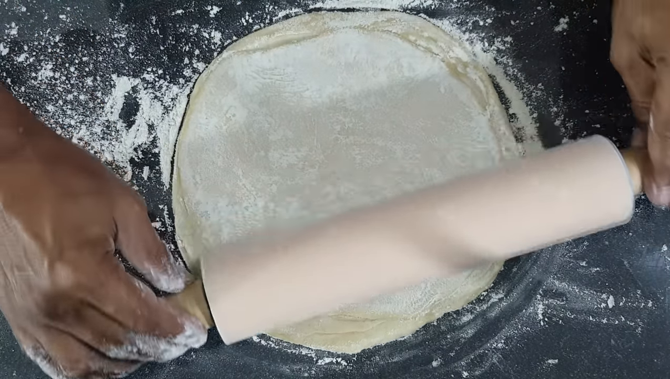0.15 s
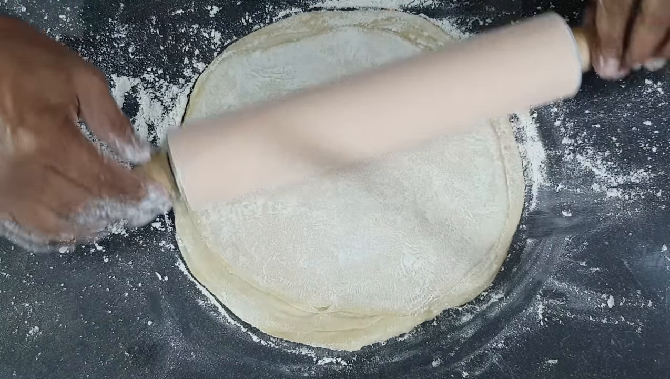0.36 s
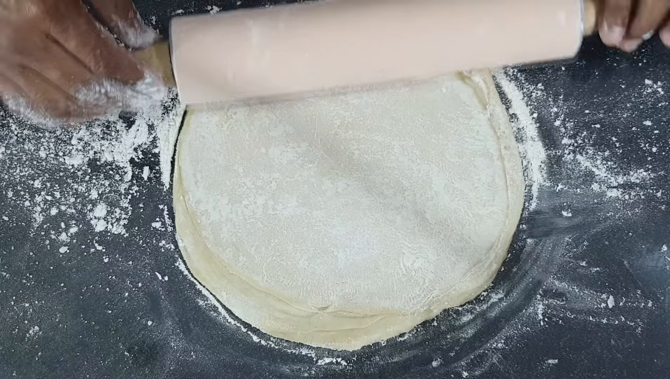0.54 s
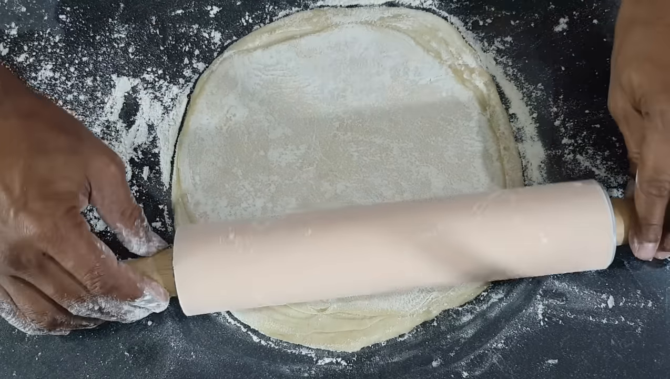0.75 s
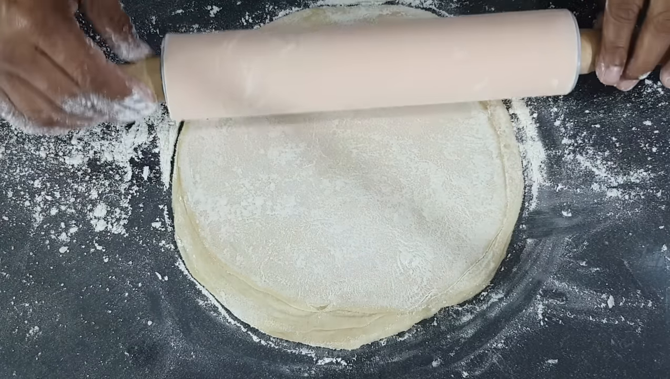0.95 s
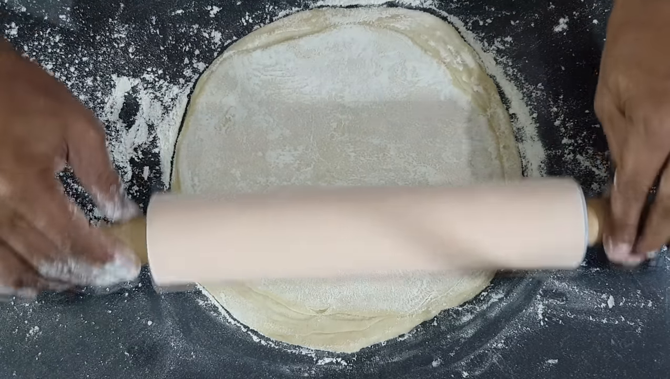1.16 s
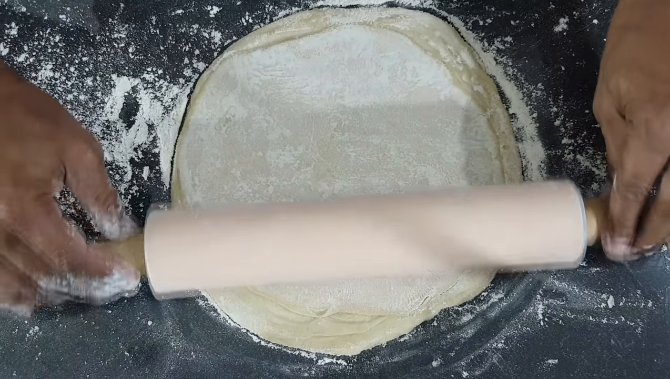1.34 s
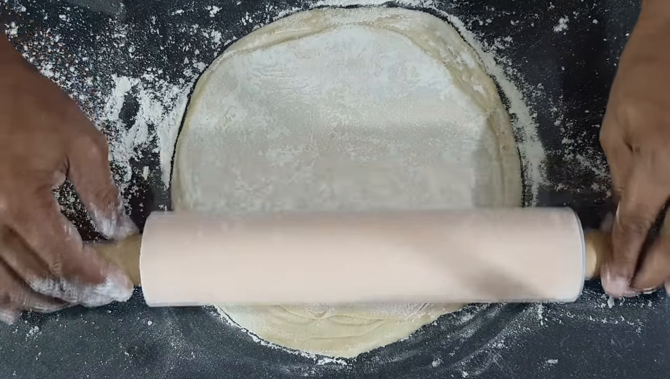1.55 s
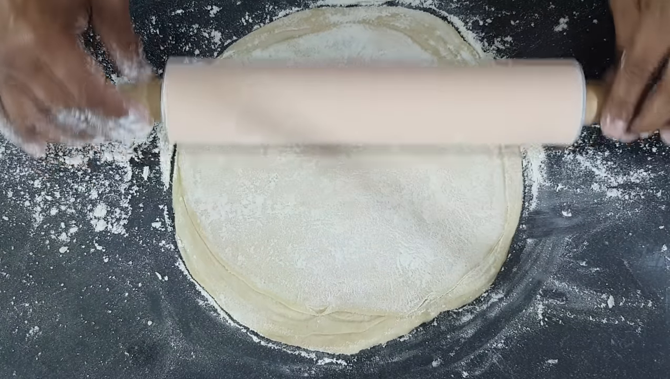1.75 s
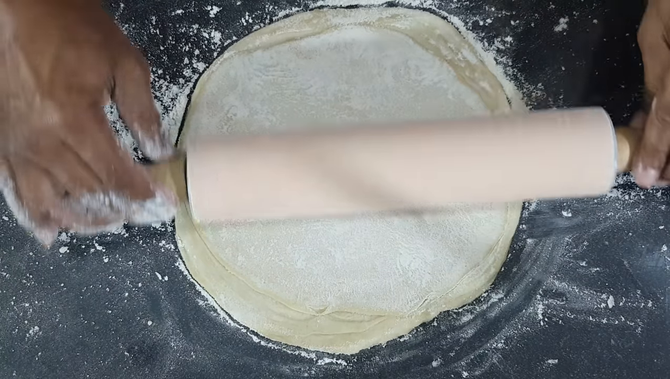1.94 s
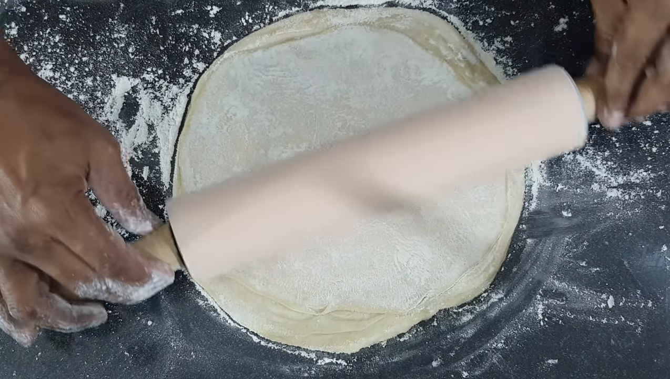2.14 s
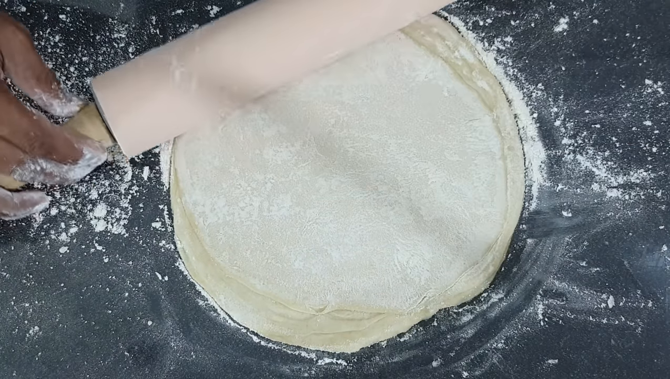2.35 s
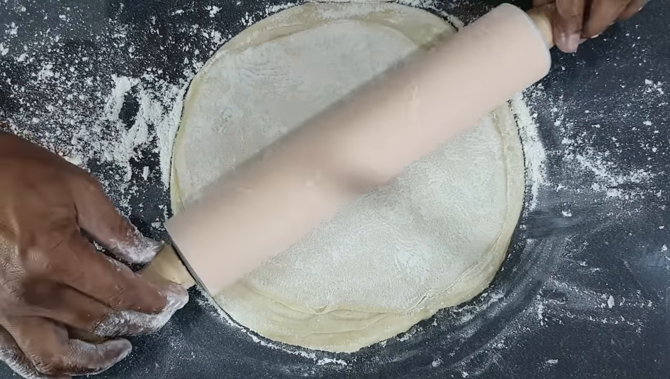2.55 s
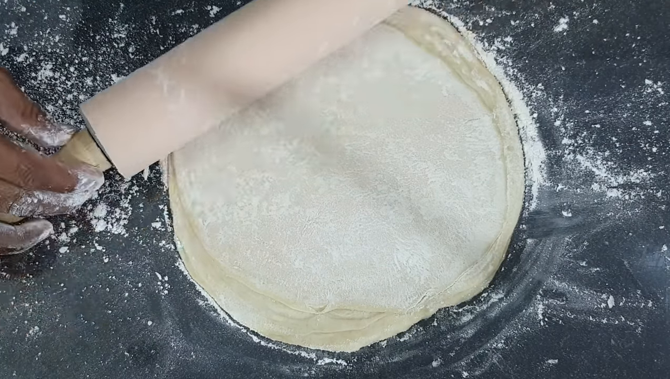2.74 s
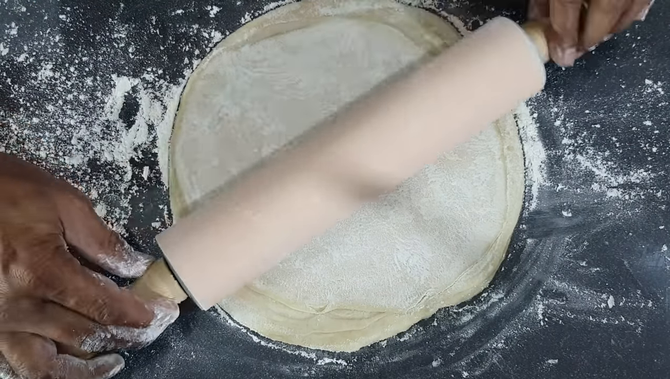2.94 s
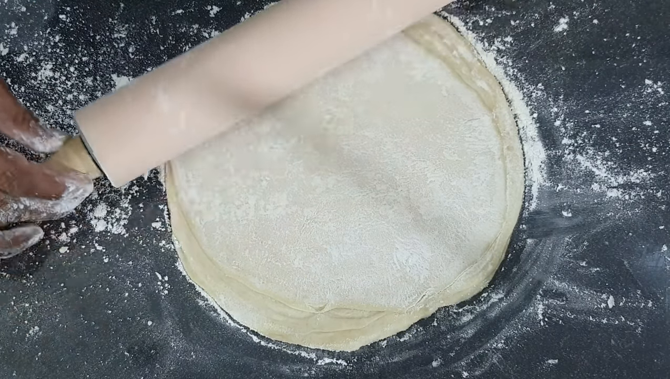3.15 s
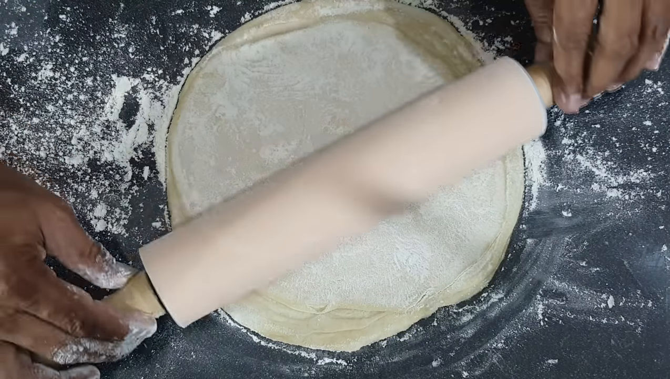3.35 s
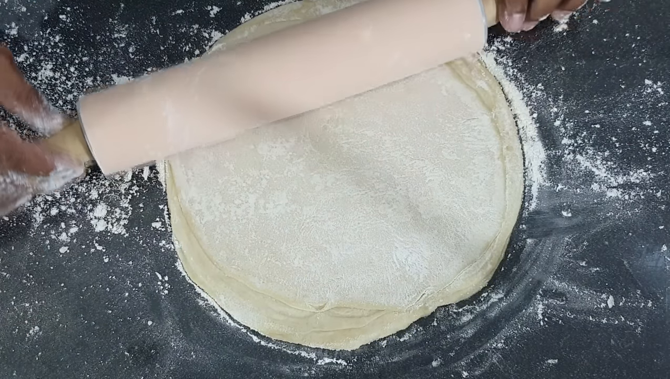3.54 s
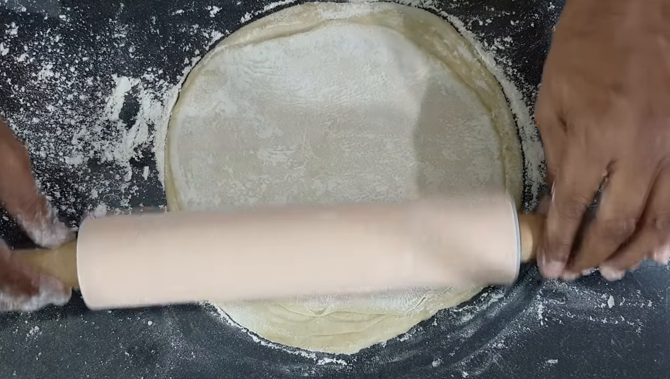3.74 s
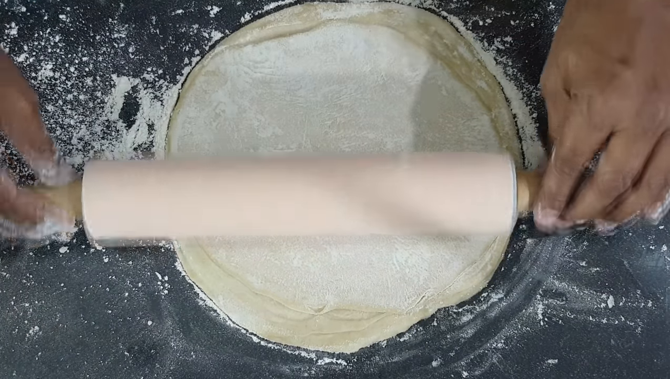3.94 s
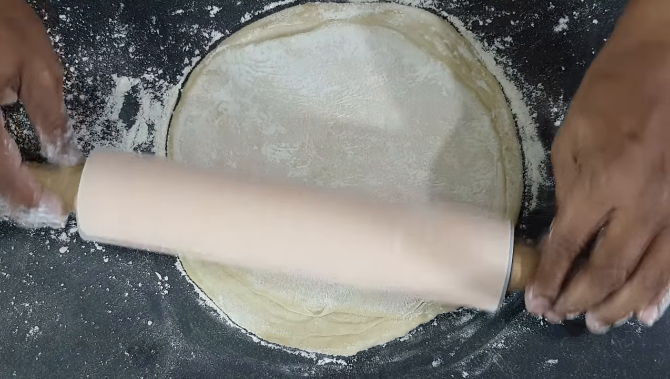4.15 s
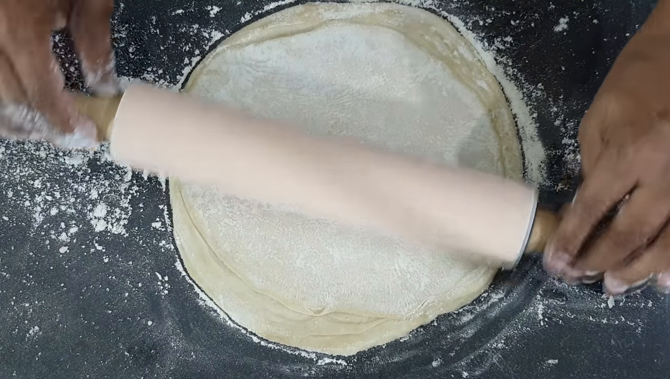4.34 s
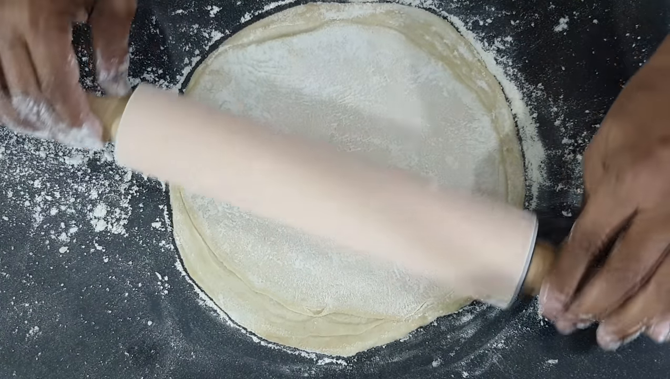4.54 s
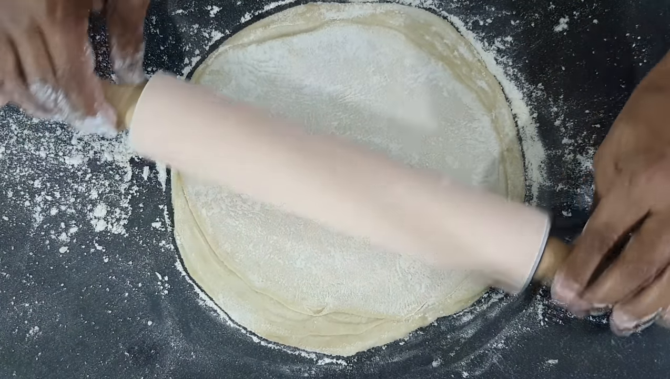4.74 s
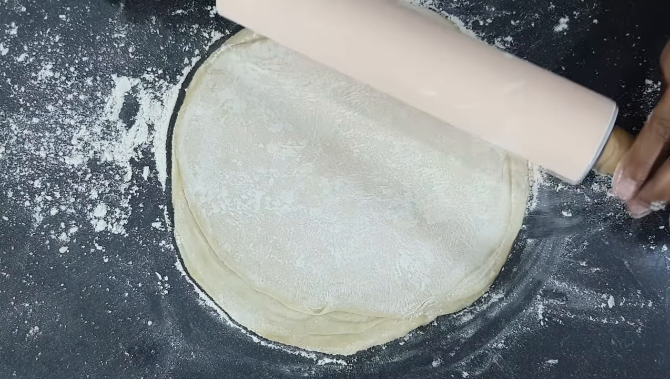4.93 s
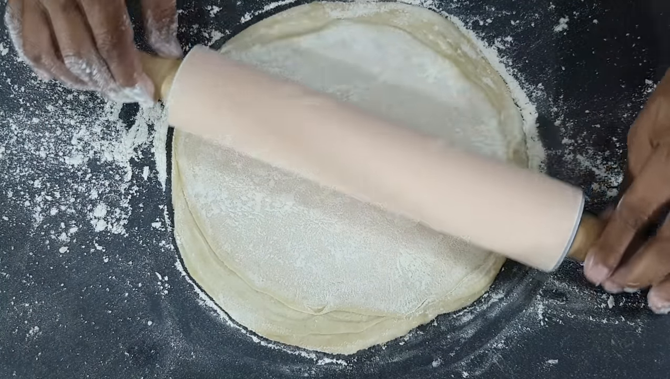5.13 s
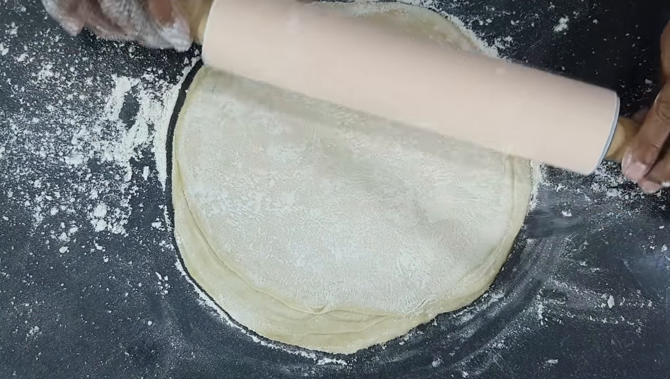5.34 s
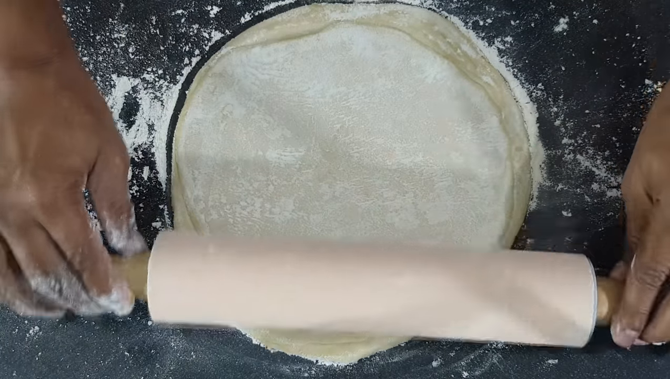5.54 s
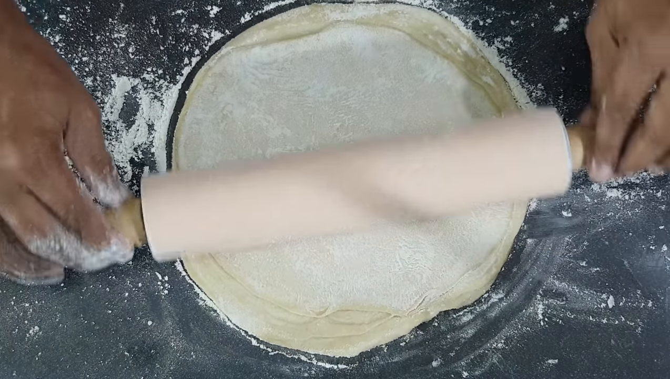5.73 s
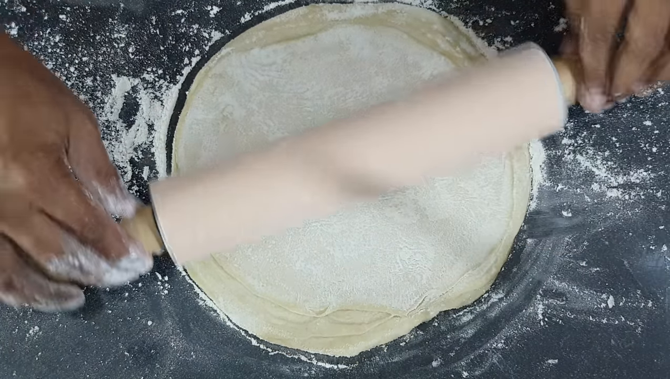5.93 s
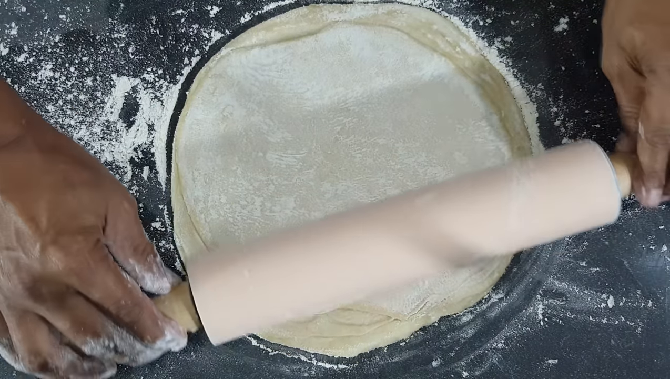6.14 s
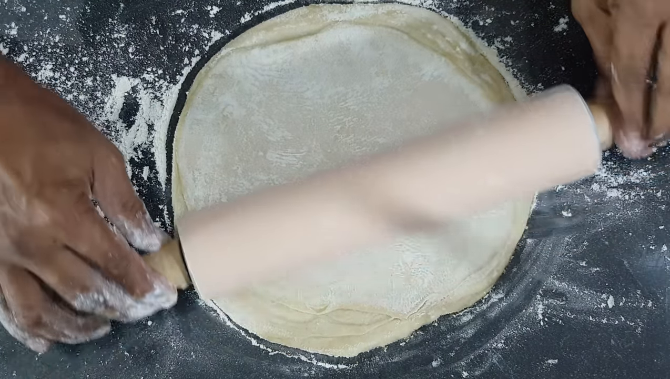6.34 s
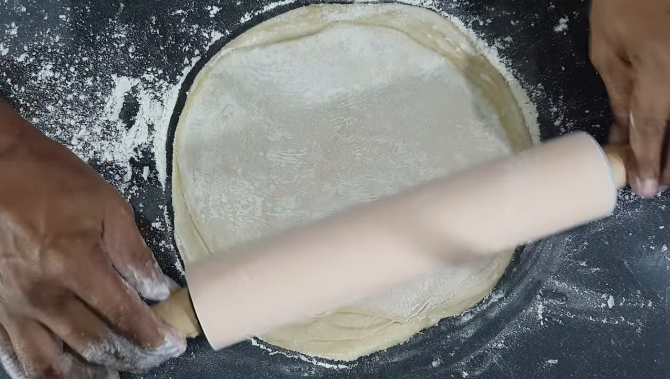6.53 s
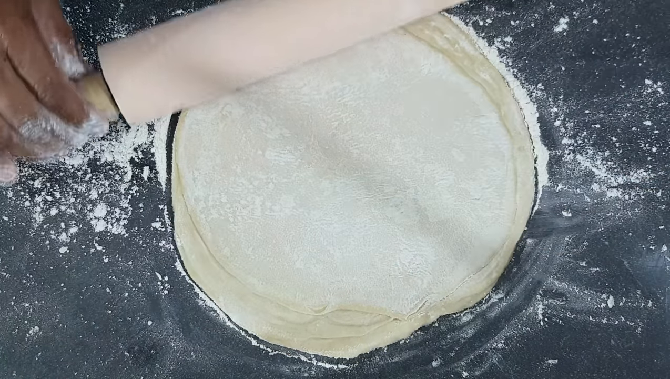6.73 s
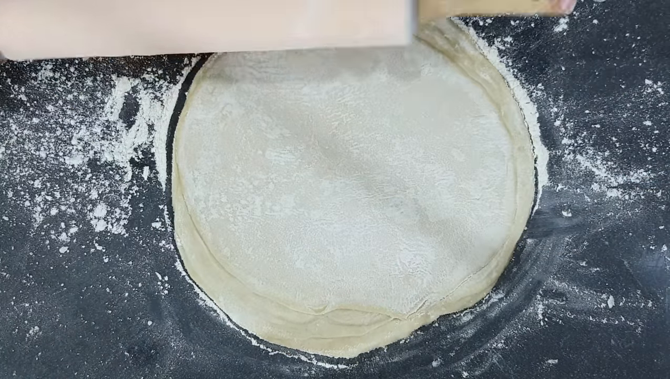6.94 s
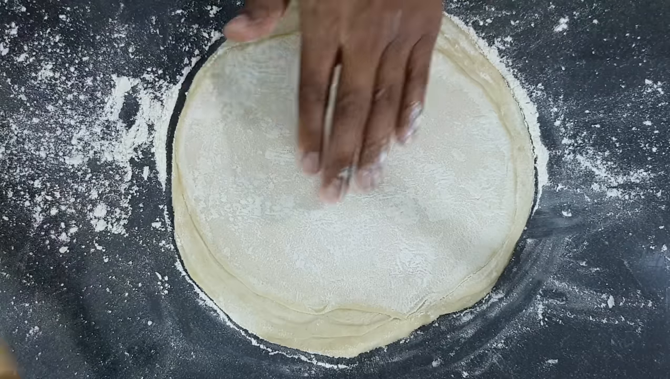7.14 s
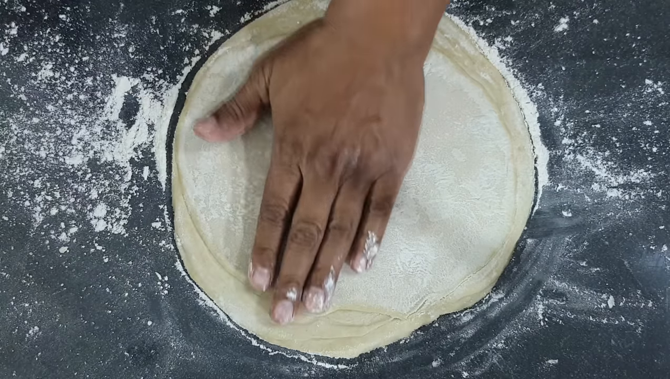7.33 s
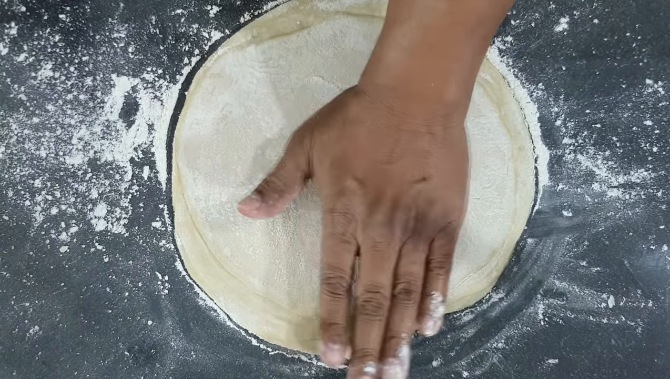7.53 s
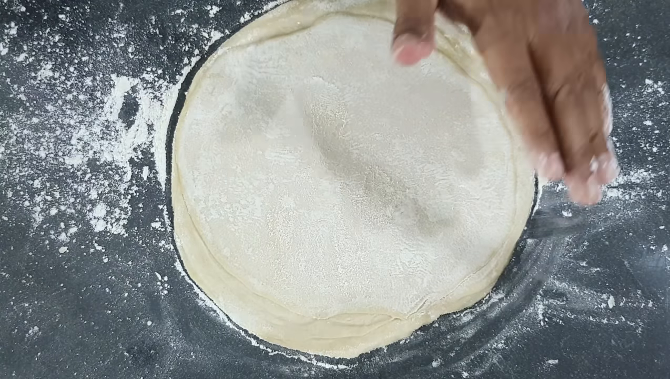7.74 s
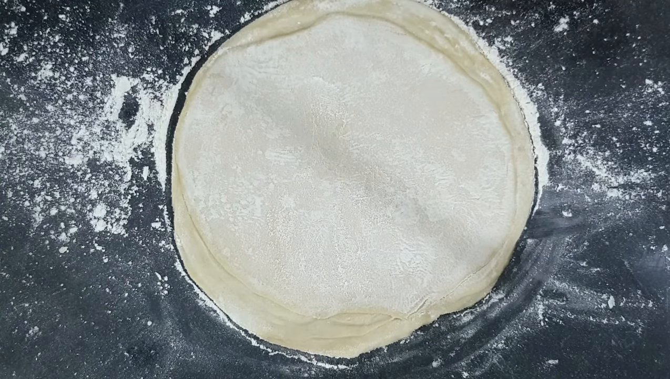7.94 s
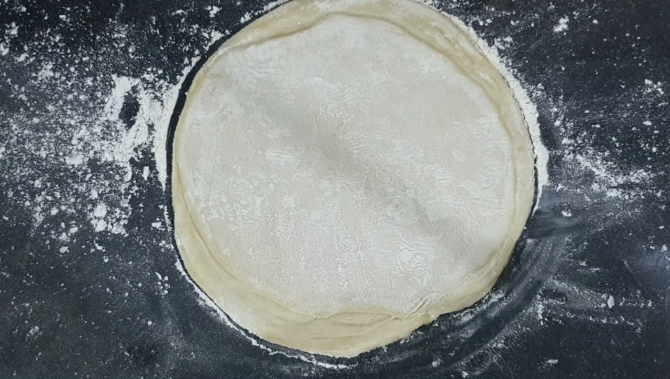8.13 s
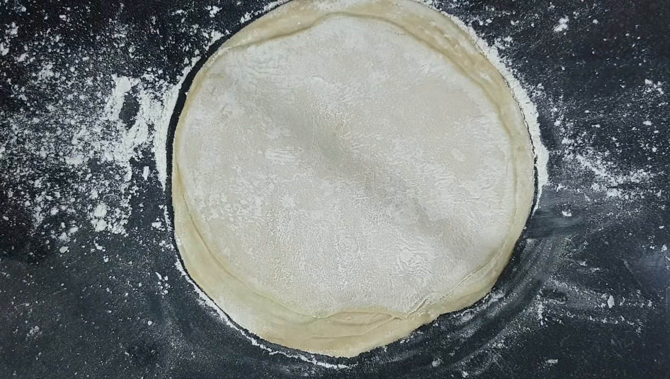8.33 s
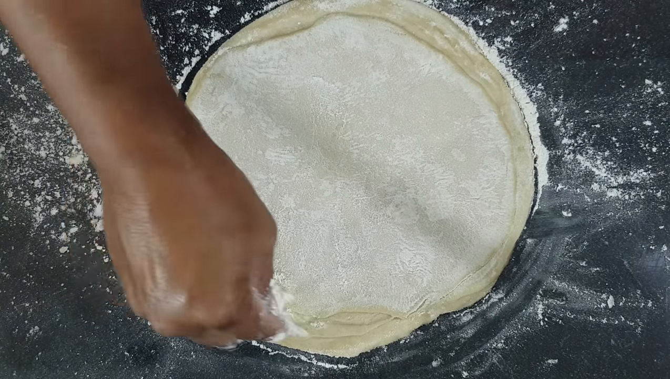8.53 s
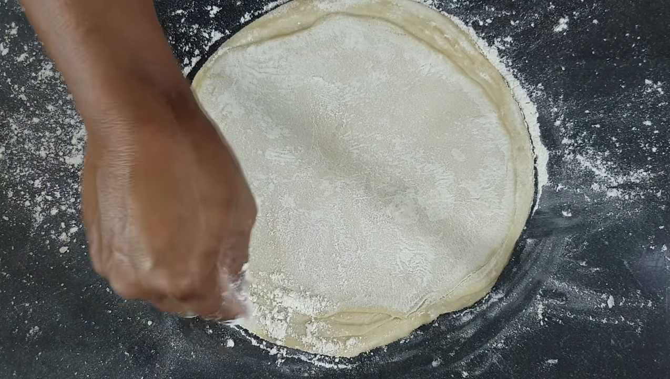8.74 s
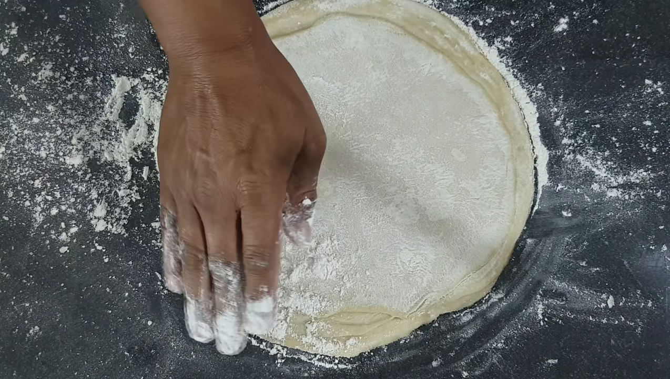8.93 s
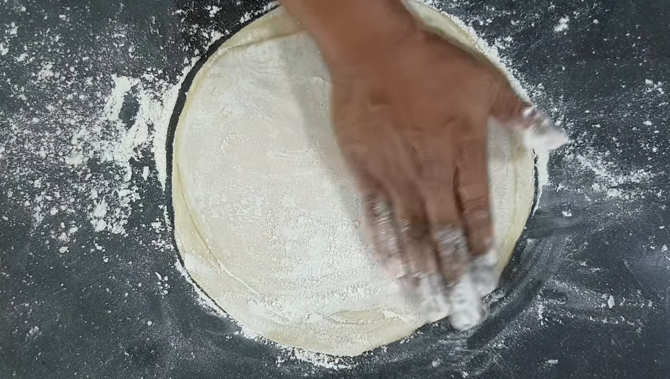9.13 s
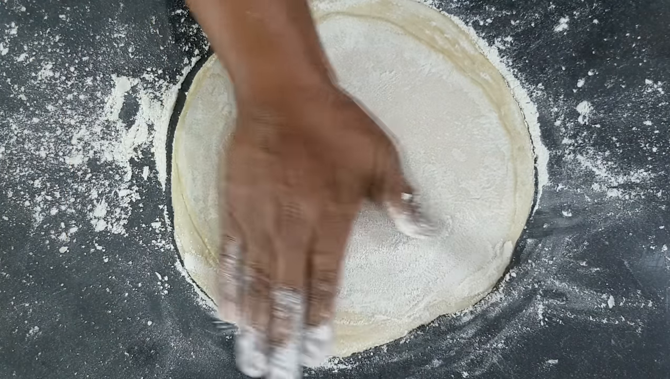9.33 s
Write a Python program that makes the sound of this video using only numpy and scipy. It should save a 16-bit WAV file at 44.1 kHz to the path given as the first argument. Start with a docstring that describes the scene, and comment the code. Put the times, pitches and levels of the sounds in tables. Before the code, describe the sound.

Close to a kitchen worktop, soft scraping and dull bumps repeat as dough is rolled out with a pin whose wooden axle rubs and occasionally taps. The last strokes drag a little harder and end in a couple of knocks. A hand rubs the dough, the pin lands with a loud clatter that rings briefly in the room, and after a pause a palm sweeps across dry flour.

```python
"""A hard-walled kitchen, one microphone close to the worktop. A rolling pin with loose wooden handles
goes back and forth over floured dough: the axle rubs and knocks in the barrel, the flour hisses and the
worktop rumbles. Then the pin is put down with a loud clatter that the walls answer, and a palm sweeps
dry flour over the dough."""
import sys
import numpy as np
from scipy import signal
from scipy.fft import rfft, irfft, next_fast_len
from scipy.io import wavfile
from scipy.ndimage import uniform_filter1d, map_coordinates

SR = 44100
rng = np.random.default_rng(int(sys.argv[2]) if len(sys.argv) > 2 else 0)


def generate_wav(signal):
    """Clip the signal to [-1, 1] and save it as 16-bit WAV at the path in sys.argv[1]."""
    frames = np.transpose(np.atleast_2d(signal))
    scaled = np.clip(frames, -1, 1) * 32767
    pcm = np.round(scaled).astype(np.int16)
    wavfile.write(sys.argv[1], SR, pcm)


N = 413658

# Pushes and pulls of the pin, from rest to rest. Each row: start and length in seconds, then axle rub,
# flour hiss and worktop rumble in dB.
PIN_STROKES = [(0.038, 0.27, -64.5, -67.5, -53.5), (0.221, 0.3, -65.5, -69.5, -56),
               (0.537, 0.27, -61.5, -67.5, -54), (0.773, 0.29, -68, -68, -49), (1.069, 0.21, -64, -69, -64),
               (1.307, 0.24, -66.5, -68.5, -47), (1.586, 0.16, -71, -68.5, -59),
               (1.719, 0.18, -82, -73.5, -51.5), (1.93, 0.19, -60, -68, -57.5),
               (2.095, 0.41, -71, -64.5, -68), (2.378, 0.26, -62.5, -68.5, -59),
               (2.65, 0.22, -70, -72, -56), (2.834, 0.23, -63, -72, -58), (3.106, 0.15, -71.5, -69.5, -52),
               (3.26, 0.2, -64, -71, -49.5), (3.456, 0.2, -73, -69.5, -53), (3.652, 0.33, -63, -66.5, -64),
               (3.894, 0.2, -66.5, -70.5, -53), (4.145, 0.24, -65.5, -69, -50),
               (4.316, 0.16, -73, -66, -68), (4.455, 0.3, -60, -65, -53), (4.72, 0.24, -69, -69.5, -50.5),
               (4.935, 0.31, -60, -67, -54.5), (5.224, 0.2, -74, -68, -48), (5.384, 0.23, -68, -69, -51.5),
               (5.594, 0.29, -66.5, -65.5, -55), (5.89, 0.28, -61, -67, -51.5), (6.12, 0.27, -63, -67, -49),
               (6.391, 0.17, -63, -69.5, -51.5), (6.557, 0.18, -69, -69, -46.5),
               (6.796, 0.26, -60.5, -65.5, -41.5)]
# Sweeps of the palm. Each row: start and length in seconds, then skin rub and worktop rumble in dB.
PALM_STROKES = [(7.046, 0.44, -70.5, -46), (7.5, 0.38, -56, -78), (8.992, 0.28, -70.5, -76.5),
                (9.278, 0.29, -48, -70)]
# The worktop's rumble. Each row, as in every spectrum here: frequency in Hz, relative density in dB.
RUMBLE_SPECTRUM = [(15, -24.5), (30, -13), (50, 2.5), (68, -1.5), (100, -6), (140, -13.5), (400, -39.5),
                   (1500, -74.5)]


def amp(db):
    return 10 ** (np.asarray(db) / 20)


def unit(x):
    return x / np.sqrt(np.mean(x ** 2) + 1e-20)


def along(points, hz):
    """Interpolate (Hz, value) points on a log frequency axis."""
    freqs, values = np.transpose(points)
    return np.interp(np.log(hz + 1), np.log(freqs + 1), values)


def add(track, start, sound):
    """Mix a sound in at start seconds."""
    part = track[round(start * SR):][:len(sound)]
    part += sound[:len(part)]


def wobble(rate):
    """A smooth random curve, rate knots a second."""
    return map_coordinates(rng.standard_normal(int(N * rate / SR) + 4), [np.arange(N) * rate / SR])


def filtered(x, response):
    """x through a gain that is a function of frequency."""
    size = next_fast_len(len(x) + SR // 4)
    return irfft(rfft(x, size) * response(np.fft.rfftfreq(size, 1 / SR)), size)[:len(x)]


def lowpass(x, hz):
    return signal.lfilter(*signal.butter(2, hz, fs=SR), x)


def coloured(x, spectrum):
    """x shaped by a spectrum, at rms 1."""
    return unit(filtered(x, lambda hz: amp(along(spectrum, hz))))


def noise(spectrum, size=N):
    return coloured(rng.standard_normal(size), spectrum)


def noise_band(centre_hz, width_hz):
    """Narrow noise that follows a pitch given for each sample."""
    flutter = filtered(rng.standard_normal(len(centre_hz)), lambda hz: 1 / (1 + (hz / width_hz) ** 2))
    return unit(flutter * np.sin(2 * np.pi * np.cumsum(centre_hz) / SR))


def friction(spectrum, rate, grain):
    """Tiny uneven slips, rate a second, on a smooth rub; grain is their strength against it."""
    slips = (rng.random(N) < rate / SR) * rng.standard_normal(N)
    return coloured(rng.standard_normal(N) + grain * unit(slips), spectrum)


def patchy(x, depth_db):
    """x at rms 1, its colour changing from moment to moment."""
    frames = signal.stft(x, nperseg=512)[2]
    patches = uniform_filter1d(rng.standard_normal(frames.shape), size=10, axis=0)
    patches = unit(uniform_filter1d(patches, size=14, axis=1))
    return unit(signal.istft(frames * amp(depth_db * patches), nperseg=512)[1][:len(x)])


def swing(length):
    """Speed of an arm's stroke, 0 to 1: half a sine from rest to rest."""
    return np.abs(np.sin(np.pi * np.arange(int(length * SR)) / (length * SR)))


def swells(strokes, grows, lag=0):
    """Gain of (start, length, dB) strokes: speed to the power grows, late by lag times the length."""
    power = np.zeros(N)
    for start, length, db in strokes:
        add(power, start + lag * length, (amp(db) * swing(length) ** grows) ** 2)
    return np.sqrt(power)


def creep(db):
    """Gain between strokes: the hands never quite rest until they let go."""
    let_go_s, release_s = 7.4, 0.18
    return amp(db) * np.clip(1 - (np.arange(N) / SR - let_go_s) / release_s, 0, 1)


def stick_slip(rows, width, arch):
    """Squeals that rise with speed; bandwidth and the pitch's arch are shares of the pitch."""
    y = np.zeros(N)
    for start, length, db, hz in rows:
        speed = swing(length)
        pitch_hz = hz * (1 - arch * (1 - speed))
        add(y, start, amp(db) * speed * noise_band(pitch_hz, width * hz))
    return y


def ring(modes, t, scatter_db):
    """Damped (Hz, width in Hz, dB) modes, their strengths scattered for each blow; peak 1."""
    least_loss = 0.05  # wood never rings for long
    y = 0
    for k, (hz, width, db) in enumerate(modes):
        fade = np.exp(-np.pi * max(width, least_loss * hz) * t)
        strength = (-1) ** k * amp(db + scatter_db * rng.standard_normal())
        y = y + strength * fade * np.sin(2 * np.pi * hz * t)
    return y / np.abs(y).max()


def fading_tones(modes, t):
    """Sum of (Hz, dB, t60 in seconds) decaying sines."""
    return sum(amp(db - 60 * t / t60) * np.sin(2 * np.pi * hz * t) for hz, db, t60 in modes)


def snap(spectrum, size):
    """One sharp minimum-phase impulse with a spectrum, energy 1."""
    cepstrum = irfft(np.log(amp(along(spectrum, np.fft.rfftfreq(size, 1 / SR)))), size)
    cepstrum[size // 2:] = 0
    y = irfft(np.exp(2 * rfft(cepstrum)), size)
    return y / np.linalg.norm(y)


def kitchen(x, wet_db, spread_hz=14000):
    """x with the room's answer; treble above spread_hz beams at the microphone and misses the walls."""
    # Reverberation time. Each row: frequency in Hz, t60 in seconds.
    decay_times = [(100, 0.1), (350, 0.33), (1000, 0.44), (3200, 0.5844), (7000, .5), (11000, 0.51),
                   (16000, 0.64)]
    wall_spectrum = [(50, -6), (300, 5.5), (1500, -2.5), (3200, -3), (4500, -3), (7500, -3), (10000, -1.5),
                     (16000, -11.5)]
    hz, t, frames = signal.stft(rng.standard_normal(SR), SR, nperseg=256)
    hz = hz[:, None]
    spread = 1 / (1 + (hz / spread_hz) ** 4)
    decay = amp(along(wall_spectrum, hz) - 60 * t / along(decay_times, hz))
    tail = signal.istft(frames * spread * decay, SR, nperseg=256)[1]
    tail *= 1 - np.exp(-np.arange(len(tail)) / SR / 0.0029)  # echoes build up between the walls
    return x + amp(wet_db) * signal.fftconvolve(x, tail / np.linalg.norm(tail))[:len(x)]


def room_tone():
    """Still air: a low murmur under a faint hiss."""
    air_spectrum = [(20, -15), (62, 2), (85, -16.5), (200, -20), (450, -30), (2000, -43.5), (3600, -43.5),
                    (6500, -37), (10000, -37.5), (16000, -41)]
    return amp(-66.5) * noise(air_spectrum)


def worktop_rumble():
    """The worktop rumbles under each stroke of the pin or the palm."""
    pin = [(start, length, db) for start, length, _, _, db in PIN_STROKES]
    hand = [(start, length, db) for start, length, _, db in PALM_STROKES]
    braking = swells(pin, grows=1.3, lag=0.3)  # peaks late, as the hands brake the pin
    pressing = swells(hand, grows=1.3, lag=-0.16)  # a palm lands before it slides
    shake = np.sqrt(braking ** 2 + pressing ** 2 + creep(-63.5) ** 2)
    rumble = noise(RUMBLE_SPECTRUM)
    running_rms = np.sqrt(np.abs(uniform_filter1d(rumble ** 2, SR // 12)))
    return shake * rumble / running_rms


def worktop_thumps():
    """The pin drops over the dough's rim, or an arm leans: the top swings and the dough squashes."""
    # Each row: time in seconds, relative level in dB, pitch in Hz.
    bumps = [(0.445, -32, 49.7), (.663, -32, 65), (.728, -36.5, 62), (1.009, -39.5, 58.6),
             (1.466, -28.5, 55), (2.015, -38.5, 88), (2.247, -28, 53), (2.305, -41, 88),
             (2.773, -42.5, 131), (2.989, -39, 53.7), (3.145, -37, 67), (3.641, -31.5, 45.5),
             (3.754, -37, 77.6), (3.818, -38.5, 73.4), (4.517, -35.5, 85), (4.719, -41, 58.3),
             (4.899, -34, 56.6), (5.122, -35.5, 66.7), (6.3, -33, 65.7), (6.551, -31.5, 64),
             (6.775, -39, 67), (6.882, -26, 52.3), (7.012, -35, 70), (7.05, -30.5, 132),
             (8.652, -45.5, 62.5), (8.699, -46, 61.9)]
    squash_spectrum = [(80, -4), (130, 1), (190, -8), (320, -22.5), (1000, -47), (4000, -90)]
    y, t = np.zeros(N), np.arange(SR // 3) / SR
    age = t / 0.011
    push = age ** 2 * np.exp(2 - age) / 4  # peaks at 1 after 22 ms
    for start, db, hz in bumps:
        squash = amp(-18.5) * noise(squash_spectrum, len(t))
        slab = np.sin(2 * np.pi * hz * t) + 0.4 * noise(RUMBLE_SPECTRUM, len(t))
        add(y, start, amp(db - 5.5) * push * (slab + squash))
    return y


def palm():
    """Dry skin sweeps fine flour across the dough."""
    skin_spectrum = [(200, -20), (800, -11), (1450, -3), (2100, -6), (2850, -1), (4400, -8), (7000, -4.5),
                     (8600, -9.5), (10500, -9.5), (12500, -21.5), (16000, -27.5)]
    sweep = swells([(start, length, db) for start, length, db, _ in PALM_STROKES], grows=1)
    return sweep * amp(1.3 * wobble(50)) * friction(skin_spectrum, rate=900, grain=0.52)


def dough(speed):
    """Dough gives way under the weight of the hands, a little louder as the pin speeds up."""
    # The hands' weight. Each row: time in seconds, relative level in dB.
    weight = [(0.0, -65.5), (0.71, -69.5), (1.33, -63.5), (2.06, -71.5), (2.74, -73.5), (2.87, -69),
              (3.8, -73), (4.7, -64.5), (5.51, -68), (6.17, -70.5), (6.43, -60.5), (6.82, -72), (7.12, -62),
              (7.48, -69), (7.7, -76)]
    dough_spectrum = [(80, -9), (200, 0.5), (450, 1), (700, -1.5), (950, -6.5), (1500, -11.5), (2500, -26),
                      (8000, -53.5)]
    weight_db = np.interp(np.arange(N) / SR, *np.transpose(weight), right=-np.inf)
    level = amp(weight_db - 1.2 + 1.3 * speed + 1.2 * wobble(32))
    return level * friction(dough_spectrum, rate=150, grain=0.6)


def flour_hiss(grip):
    """Coarse flour crunches under the pin, and the finest powder fizzes when it runs fast."""
    # The pin or a hand brushes loose flour. Each row: start and length in seconds, level in dB.
    swishes = [(.22, 0.16, -68.5), (.63, 0.13, -69), (2.13, .12, -69.5), (2.92, 0.099, -74),
               (3.32, 0.095, -75), (3.78, .17, -70), (5.12, 0.054, -68), (5.28, 0.083, -65),
               (5.66, .1, -68), (6.13, 0.0932, -68), (6.99, 0.14, -57.5), (7.1, 0.14, -72)]
    coarse_spectrum = [(1000, -24.5), (2800, -5.5), (4300, -6), (5700, -1.5), (7800, -2), (8600, -7),
                       (11500, -10.5), (15500, -19.5)]
    powder_spectrum = [(3000, -16), (6000, -4), (9000, -4), (11500, -1.5), (13500, -12), (16000, -17)]
    strokes = [(start, length, db) for start, length, _, db, _ in PIN_STROKES]
    swish = swells(swishes, grows=0.874)
    hiss = np.sqrt(swells(strokes, grows=0.52) ** 2 + creep(-77) ** 2 + (amp(-2) * swish) ** 2)
    hiss *= amp(0.55 * grip + 0.77 * wobble(13))
    coarse = hiss * patchy(friction(coarse_spectrum, rate=980, grain=0.52), depth_db=2)
    fizz = amp(-11.5 + 1.8 * wobble(5.5)) * swells(strokes, grows=0.84)
    powder = np.hypot(fizz, swish) * friction(powder_spectrum, rate=2100, grain=0.46)
    return coarse + powder


def flour_squeaks():
    """Dry flour sticks and slips under the pin in a high whisper."""
    # Each row: start and length in seconds, level in dB.
    squeaks = [(0.058, 0.12, -73), (.33, 0.12, -69), (0.548, .08, -71), (.89, 0.1, -68.5),
               (1.1, .09, -71.5), (1.38, .08, -68), (1.62, 0.083, -69.5), (1.745, .06, -68),
               (1.93, .14, -68.5), (4.8, 0.112, -72), (5.732, 0.094, -64), (5.936, .08, -68),
               (6.228, .13, -68.5), (6.6, 0.13, -68)]
    pitched = [(*row, 7250 * (1 + 0.025 * rng.standard_normal())) for row in squeaks]
    return stick_slip(pitched, width=0.088, arch=0.0302)


def axle_rub(grip):
    """The axle rubs in the barrel; at speed the rub gathers in a wandering resonance."""
    axle_spectrum = [(200, -22), (700, -9.5), (1100, -2.5), (1500, -0.5), (2300, -1), (3300, -2.5),
                     (4300, -13.5), (8000, -16.5), (16000, -44)]
    strokes = [(start, length, db) for start, length, db, _, _ in PIN_STROKES]
    level = np.hypot(swells(strokes, grows=1.4), creep(-75)) * amp(grip - 0.86)
    rub = level * patchy(friction(axle_spectrum, rate=1200, grain=0.76), depth_db=2)
    chafe_hz = 1793 * np.exp(0.16 * wobble(9))
    chafe = unit(noise_band(chafe_hz, width_hz=460) * amp(2.6 * wobble(13)))
    return rub + amp(-8) * swells(strokes, grows=2.9) * chafe


def axle_groans():
    """The axle binds and groans in the hollow barrel."""
    # Each row: start and length in seconds, level in dB, pitch in Hz.
    groans = [(1.21, 0.39, -65.5, 657), (3.145, 0.054, -59, 599), (6.245, 0.071, -60, 1380),
              (6.465, .045, -56, 1420)]
    return stick_slip(groans, width=0.1, arch=0.0793)


def handle_drag(speed, grip):
    """On the last strokes a handle drags hard on the axle and resonates."""
    handle_spectrum = [(200, -20), (320, -7), (430, 3.5), (750, -4.5), (950, -1.5), (1200, -5.5), (1450, 3),
                       (1750, -6.5), (2600, -22), (8000, -43)]
    t = np.arange(N) / SR
    from_s, to_s = 6.24, 7.15
    dragging = uniform_filter1d(1.0 * ((t > from_s) & (t < to_s)), SR // 50)
    level = amp(-58 + 12 * (speed - 1) + 1.5 * grip)
    return dragging * level * friction(handle_spectrum, rate=700, grain=0.75)


def axle_knocks():
    """The loose axle taps the barrel; each spot favours its own modes, and softer taps are duller."""
    # Each row: time in seconds, relative level in dB, treble cutoff in Hz, favoured frequency in Hz,
    # the hollow note's level in dB and pitch in Hz, the room's share in dB.
    taps = [(.371, -48, 1290, 1140, -4.5, 390, -8), (2.776, -37, 1450, 1300, -5, 546, -7.5),
            (2.785, -33, 1650, 1570, 1.5, 560, -6.5), (3.997, -58.5, 1500, 1200, -1, 594, -10),
            (4.64, -27, 4200, 1860, -17, 610, -9.5), (4.6427, -28.5, 4800, 2950, -18, 418, -9),
            (4.836, -50.5, 1500, 1087, -9, 440, -7), (5.288, -54.5, 1693, 1380, -5, 605, -6),
            (6.281, -44, 1800, 993, -3, 373, -8.5), (6.88, -51, 1400, 1500, 3.5, 440, -9),
            (7.0036, -29, 2300, 1290, -21, 547, -11.5), (7.138, -23, 2700, 1750, -17, 403, -10.3)]
    # Modes of the wood and of a hard blow's tick. Each row: frequency and width in Hz, relative dB.
    wood_modes = [(1015, 85, -4), (1219, 130, -10), (1455, 100, -7), (1790, 160, -1.5), (2150, 220, -7),
                  (2720, 450, -1.5), (3200, 150, -1.5), (3520, 160, -9)]
    tick_modes = [(6310, 710, 1.5), (7285, 400, -5.5)]
    crack_spectrum = [(100, -15), (700, -2), (3000, 2), (7500, -5.5), (10000, -15), (16000, -32)]
    focus_db, focus_octaves = 5.5, 0.32
    y, t = np.zeros(N), np.arange(SR) / SR
    hardest_db = max(row[1] for row in taps)
    for start, db, cutoff_hz, focus_hz, hollow_db, hollow_hz, room_db in taps:
        modes = [(hz, width, level + focus_db * np.exp(-(np.log2(hz / focus_hz) / focus_octaves) ** 2))
                 for hz, width, level in wood_modes]
        crack = 0.25 * amp(-60 * t / 0.0096) * noise(crack_spectrum, len(t))
        wood = lowpass(ring(modes, t, scatter_db=2.5) + crack, cutoff_hz)
        hollow = (1 - np.exp(-t / 0.001)) * fading_tones([(hollow_hz, hollow_db, 0.045)], t)
        # the harder the blow, the shorter the contact and the stronger its tick
        tick = amp(2.3 * (db - hardest_db) - 11.5) * ring(tick_modes, t, scatter_db=0)
        knock = kitchen(wood + tick, wet_db=room_db, spread_hz=7800) + kitchen(hollow, wet_db=-10)
        add(y, start, amp(db + 5) * knock)
    return y


def pin_landing():
    """The pin is put down and bounces: each contact clacks and shakes the worktop's resonances."""
    # Each row: time in seconds, relative clack and rattle levels in dB, treble cutoff in Hz.
    contacts = [(7.8008, -9.5, -25, 13000), (7.8127, -12.5, -24.5, 6990), (7.8385, -17, -19.5, 5500),
                (7.8506, -8, -25.5, 9010)]
    # Its weight meets the slab, one end after the other. Each row: time in seconds, gain in dB.
    end_falls = [(7.806, -21), (7.866, -19)]
    # The barrel's hard ring and the slab's low one. Each row: frequency in Hz, dB, t60 in seconds.
    barrel_modes = [(2850, -5, 0.012), (3180, -0.5, .021), (5300, -7.5, 0.004)]
    slab_modes = [(86.94, -9, .5), (132, 4.5, .5), (235, -17.5, .68), (270, -17, .52), (309, -16, .52),
                  (368, -12, .54), (480, -13, .58), (618, -18, .56), (707.3, -19, .54)]
    clack_spectrum = [(60, -12), (500, -6), (1100, -10), (1450, -2), (2300, -5.5), (3200, 3), (4100, -5.5),
                      (5500, -7.5), (7500, -10), (9000, -18.5), (12000, -23), (16000, -42)]
    rattle_spectrum = [(30, -21), (80, -2), (200, -5), (450, -3), (750, -10), (1100, -17), (1450, -13),
                       (2200, -21.5), (5000, -37), (16000, -78.5)]
    y, t = np.zeros(N), np.arange(SR) / SR
    bite = fading_tones(barrel_modes, t)
    for start, clack_db, rattle_db, cutoff_hz in contacts:
        # the wood chatters on the hard top for a few milliseconds
        chatter = (1 - np.exp(-t / 0.0004)) * amp(-60 * t / 0.017) * noise(clack_spectrum, len(t))
        clack = kitchen(amp(10) * snap(clack_spectrum, len(t)), wet_db=1.5)
        add(y, start, amp(clack_db) * lowpass(clack + chatter + bite, cutoff_hz))
        rattle = (1 - np.exp(-t / 0.0015)) * amp(-60 * t / 0.65) * noise(rattle_spectrum, len(t))
        add(y, start, amp(rattle_db) * rattle)
    boom = (1 - np.exp(-t / 0.0091)) * fading_tones(slab_modes, t)
    for start, db in end_falls:
        add(y, start, amp(db) * boom)
    return y


def scene():
    """At the microphone: the rubbing is close and nearly dry, while the blows stir the room."""
    speed = np.minimum(swells([(start, length, 0) for start, length, *_ in PIN_STROKES], grows=0.84), 1)
    grip = wobble(35)  # the hands' pressure trembles
    under_pin = dough(speed) + flour_hiss(grip) + flour_squeaks()
    inside_pin = axle_rub(grip) + axle_groans() + handle_drag(speed, grip)
    rubbing = kitchen(palm() + under_pin + inside_pin, wet_db=-16)
    return room_tone() + worktop_rumble() + worktop_thumps() + rubbing + axle_knocks() + pin_landing()


def record(dry):
    """The loudest peaks are softly rounded, and the recorder keeps nothing above its band limit."""
    ceiling, top_hz = 0.9, 15600
    rounded = dry / (1 + (dry / ceiling) ** 6) ** (1 / 6)
    return filtered(rounded, lambda hz: hz < top_hz)


dry = scene()
out = record(dry)
generate_wav(out)
```